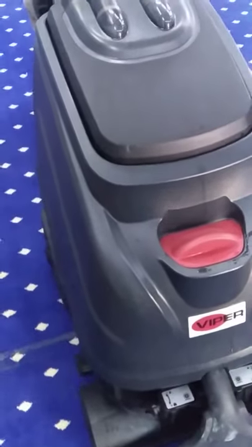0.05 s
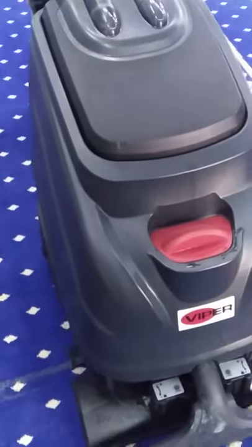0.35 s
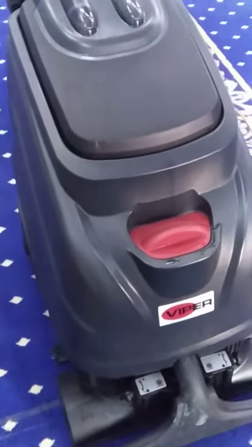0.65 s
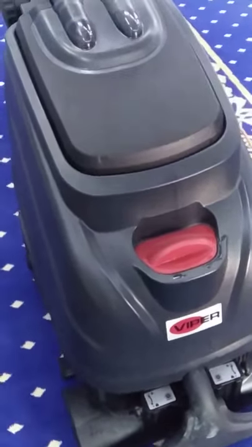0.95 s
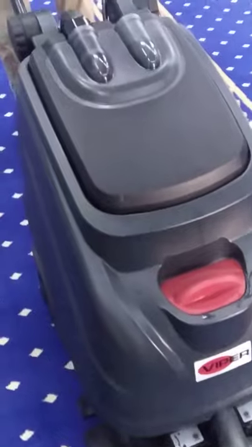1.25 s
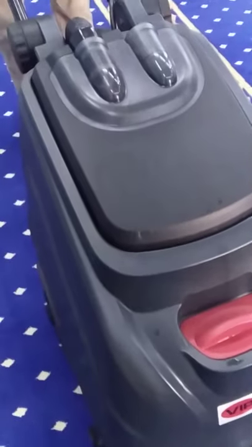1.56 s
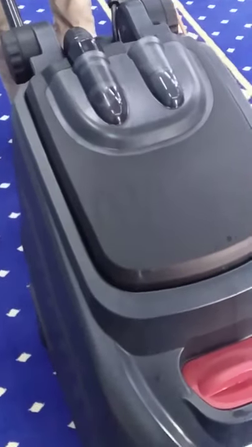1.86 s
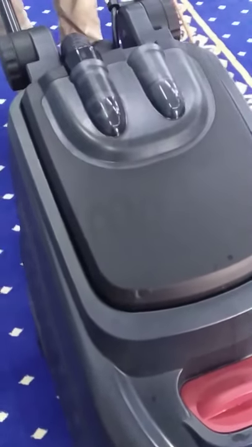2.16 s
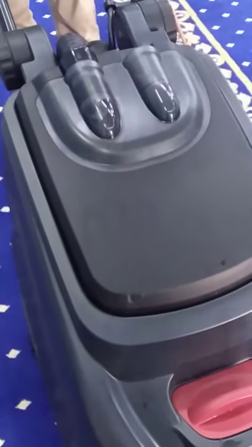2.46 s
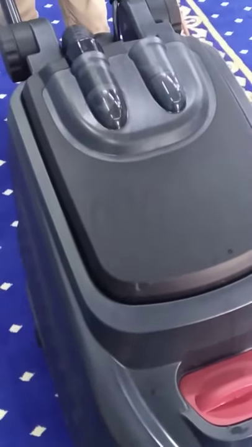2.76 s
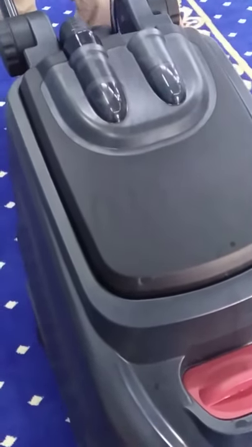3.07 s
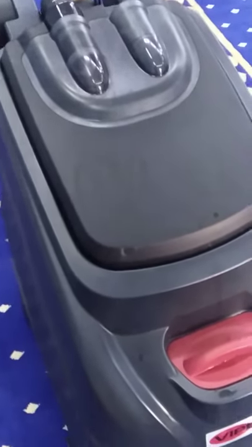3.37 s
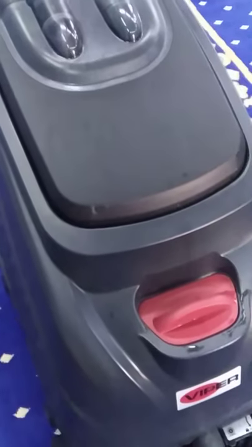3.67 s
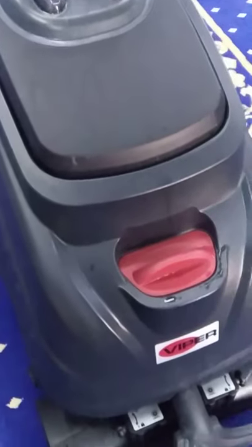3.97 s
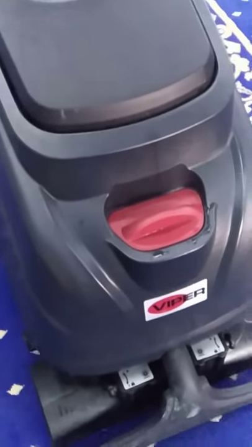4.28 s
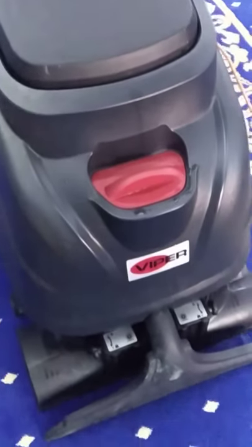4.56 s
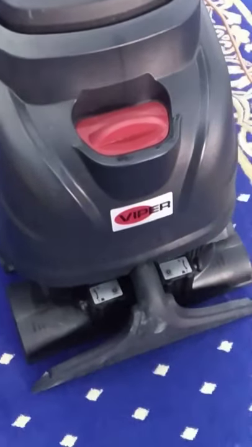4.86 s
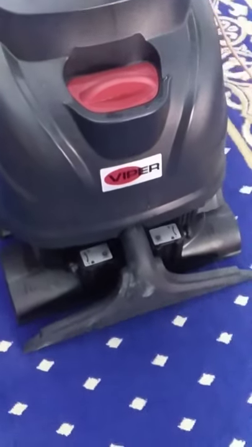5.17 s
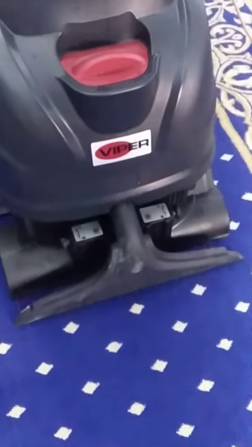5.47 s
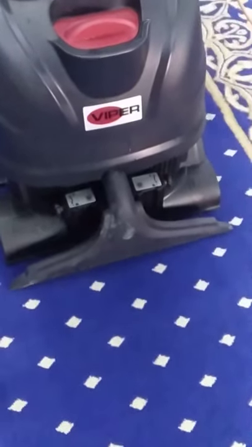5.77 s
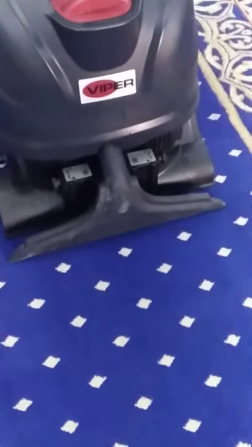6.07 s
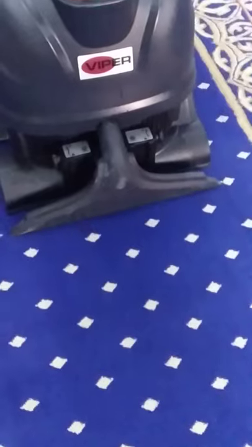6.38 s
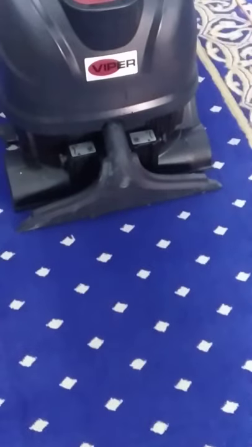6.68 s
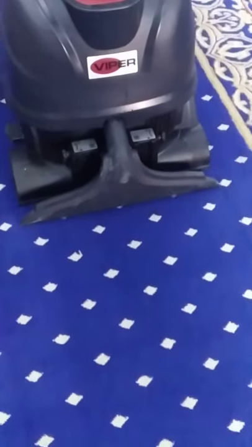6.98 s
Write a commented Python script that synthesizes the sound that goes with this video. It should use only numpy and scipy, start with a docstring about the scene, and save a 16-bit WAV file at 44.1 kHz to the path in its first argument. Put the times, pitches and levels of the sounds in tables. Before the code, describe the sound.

A carpet cleaning machine runs for the whole seven seconds, close to a moving stereo microphone in a carpeted room with little echo. Its vacuum motor gives a strong hum at a steady pitch, with thinner, higher whines fading in and out above it. Underneath, the brush rumbles in the pile while air roars and rushes through the tank. The hum is strongest from about 0.3 to 1.4 seconds, then wavers and shifts between the sides. The suction nozzle adds a fluttering, wet hiss that swells around 0.6 to 1, 3, 4 and 6 seconds and gradually brightens a little. Tiny spits of water come right at the start and near 0.6, 1.8 and 2.1 seconds. Hollow drones from the housing swell gently in turn, near 0.7, 3, 5 and 6 seconds. The machine is still running at the end.

```python
"""A carpet cleaner is drawn slowly over carpet, indoors, close to a moving microphone pair.
From the start the vacuum motor hums at its shaft rate and whines on higher orders, the brush rumbles
in the pile, air roars through the tank, and the suction shoe hisses with fine spray.
Until about 2 s the shoe also spits water. Hollows of the housing drone, swelling one after another
up to 6 s. The top of the hiss opens gradually; the machine is still running at the end, at 7 s."""
import sys
import numpy as np
from scipy import signal
from scipy.fft import rfft, irfft
from scipy.io import wavfile

SR = 44100
rng = np.random.default_rng(int(sys.argv[2]) if len(sys.argv) > 2 else 0)


def persist_wave(psi):
    """Save psi, clipped to +-1, as 16-bit WAV."""
    counts = np.round(np.clip(psi, -1, 1) * 32767).astype(np.int16)
    wavfile.write(sys.argv[1], SR, np.atleast_2d(counts).T)


N = 314433
TIME = np.arange(N) / SR
HZ = np.fft.rfftfreq(N, 1 / SR)

# phase between the microphones: (frequency [Hz], left lead [rad])
MIC_LEAD = [(100, 0), (800, -0.2), (1400, -0.03), (2000, -1.87), (2700, -2.4), (3200, -2.75), (3450, -3.1),
            (3680, -3.17), (3900, -4.1), (4100, -4.4), (4600, -6.5), (5400, -6.5), (6400, -4.5)]
# suction as the shoe's seal tightens and loosens: (time [s], level [dB])
SUCTION_LEVEL = [(0.0, -45), (0.09, -42.5), (0.15, -42.5), (0.45, -39.5), (0.56, -39.5), (0.64, -34.5),
                 (0.8, -37), (1.0, -37.5), (1.07, -37), (1.28, -42), (1.68, -46.5), (1.82, -43.5),
                 (1.9, -44), (2.04, -41), (2.12, -40.5), (2.2, -41), (2.3, -40), (2.4, -41), (2.5, -39.5),
                 (2.68, -42.5), (2.74, -37.5), (2.98, -37.5), (3.07, -38), (3.17, -39), (3.25, -39.5),
                 (3.42, -41.3), (3.77, -40), (3.87, -37.5), (3.99, -36.5), (4.65, -38), (5.16, -41.5),
                 (5.72, -40.5), (5.8, -36.5), (5.97, -35), (6.2, -38), (6.38, -38.5), (6.55, -41),
                 (6.75, -42), (7.11, -40.5)]
# shoe hiss: (frequency [Hz], level [dB])
HISS_SPECTRUM = [(2000,-7.5), (3600,-34), (3950,-2.5), (4300,-0.5), (5200,1.5), (7000,2), (7850,1),
                 (8200,-11), (9000,-11), (10200,-16), (11200,-22), (13300,-25), (14500,-34)]
# shoe hiss: (frequency [Hz], left-right [dB])
HISS_BALANCE = [(3300, 18), (3750, -10), (4000, 5.5), (4600, 4), (6000, 8.5), (7600, 8)]


def gain_of(db):
    """Decibels to amplitude."""
    return 10 ** (np.asarray(db) / 20)


def unit_rms(x):
    """Scale to rms 1."""
    return x / np.sqrt(np.mean(x ** 2) + 1e-20)


def curves(rows):
    """Each column of a time table, per sample."""
    times_s, *columns = np.transpose(rows)
    return [np.interp(TIME, times_s, c) for c in columns]


def per_bin(points):
    """A frequency table, per FFT bin."""
    hz, value = np.transpose(points)
    return np.interp(np.log(HZ + 1), np.log(hz + 1), value)


def colour(points):
    """Spectrum [dB], falling 20 dB/octave beyond the table's ends."""
    hz = np.transpose(points)[0]
    octaves_out = abs(np.log2((HZ + 1) / np.clip(HZ + 1, hz[0], hz[-1])))
    return per_bin(points) - 20 * octaves_out


def peak_db(centre_hz, half_width_hz):
    """Resonance curve, 6 dB down at the half-width."""
    return -20 * np.log10(1 + ((HZ - centre_hz) / half_width_hz) ** 2)


def wander(rate_hz):
    """Random drift of rms 1, up to about rate_hz."""
    return unit_rms(irfft(rfft(rng.standard_normal(N)) / (1 + (HZ / rate_hz) ** 4), N))


def pan(side_db):
    """Constant-power left and right gains."""
    gains = gain_of(np.array([side_db, -side_db]) / 2).reshape(2, -1)
    return gains / np.sqrt(np.mean(gains ** 2, 0))


def turbulence():
    """Two independent white noises."""
    return rng.standard_normal((2, N))


def at_mics(drive, colour_db, side_db):
    """Colour two independent noises and blend them into a partly coherent pair of rms 1."""
    # likeness of the two channels: (frequency [Hz], coherence [0-1])
    mic_coherence = [(30, 0.6), (70, .98), (160, .98), (300, .88), (550, 0.86), (750, 0.74), (1100, .62),
                     (1500, 0.15), (2000, 0.35), (2700, 0.55), (3200, 0.8), (3400, 1), (3850, 1),
                     (4100, 0.15), (7500, 0.5), (8300, 0.05)]
    coherence = np.clip(per_bin(mic_coherence), 0, 1)
    left, other = rfft(drive)
    right = (coherence * left + np.sqrt(1 - coherence ** 2) * other) * np.exp(-1j * per_bin(MIC_LEAD))
    return unit_rms(irfft(np.array([left, right]) * gain_of(colour_db) * pan(side_db), N))


def room(x, wet_db=-15, t60_s=0.3):
    """Add the faint scattered reflections of a carpeted room."""
    t = TIME[:round(t60_s * SR)]
    tail = rng.standard_normal(len(t)) * np.exp(-np.log(1000) * t / t60_s)
    return x + gain_of(wet_db) * signal.oaconvolve(x, tail[None] / np.linalg.norm(tail))[:, :N]


def motor(whine_db=-3.5, jitter_hz=0.14, shake_db=1.2, fade_db=2.8, ripple_rad=0.56, ripple_hz=100):
    """Shaft unbalance hums; bearings, fan blades and commutator whine at multiples of the shaft rate."""
    # vacuum motor: (time [s], shaft rate [Hz])
    shaft_rate = [(0.0, 299.4), (0.72, 298.5), (1.05, 299.3), (1.4, 301.3), (1.74, 302.1), (1.85, 299.7),
                  (2.1, 299.6), (2.45, 300.3), (4.02, 300.7), (4.41, 302.4), (5.85, 301.3), (6.48, 302.5),
                  (7.11, 301.2)]
    # hum as the microphones cross the room's standing waves: (time [s], left [dB], right [dB])
    hum_levels = [(0.0, -46, -37), (0.1, -44, -48), (0.24, -26, -27.5), (0.63, -23, -23), (0.9, -27.5, -26),
                  (1.15, -37, -32), (1.38, -28.5, -29.5), (1.58, -48, -33.5), (1.74, -40.5, -54),
                  (1.85, -52, -37), (1.98, -31, -36.5), (2.1, -28, -35), (2.27, -32.5, -50),
                  (2.55, -27.5, -38), (2.75, -31.5, -48), (3.02, -33, -40), (3.15, -28.5, -39),
                  (3.45, -41, -50), (3.6, -35.5, -43), (3.75, -56, -58), (3.88, -36.5, -48),
                  (3.98, -42, -56), (4.1, -40, -52), (4.27, -31, -38), (4.62, -31.5, -40.5),
                  (5.1, -34.5, -49), (5.52, -35.5, -50), (5.65, -44.5, -40.5), (6.06, -36.5, -42),
                  (6.5, -45.5, -50), (6.72, -58, -52), (6.93, -49, -45), (7.11, -40, -36.5)]
    # hum phase in the same waves: (time [s], left lead [rad])
    hum_lead = [(0, 0.4), (.75, 0.27), (1.25, 0.5), (1.53, 0.5), (1.65, 3.5), (1.87, 1), (1.94, 0.3),
                (2.2, -2), (2.3, 1), (2.68, 0.7), (2.78, -1), (3.05, -1.5), (3.3, -2), (3.58, -1.0),
                (3.7, 2), (4.05, 2.6), (4.2, -0.9), (4.75, 0.1), (5.6, -1.7), (6.1, -1.0), (6.5, -1.8),
                (7.13, -0.3)]
    # whine at the moving microphones, by shaft order: (time [s], left [dB], right [dB])
    whine_orders = { 3: [(0, -58, -59), (.35, -58, -55), (.7, -47, -66), (1.1, -55, -62), (1.35, -48, -68),
                    (1.6, -43, -49.5), (1.87, -51, -63), (2.25, -47, -44), (2.65, -41, -45),
                    (2.85, -56, -56), (3.08, -45.5, -52), (3.4, -49, -60), (4.0, -55, -54),
                    (4.35, -61, -64), (4.6, -48, -49), (5.35, -65, -66), (5.6, -51, -48), (6.0, -47, -47),
                    (6.25, -57, -50), (6.75, -47, -45), (7.13, -49, -52)], 6: [(0, -64, -64),
                    (.3, -54, -51), (.5, -55, -51), (.7, -56, -45), (.95, -59, -64), (1.2, -56, -53),
                    (1.35, -50, -52), (1.7, -49, -45), (1.95, -58, -57), (2.35, -45, -57), (2.65, -55, -64),
                    (3.15, -63, -62), (3.55, -49, -52), (4.1, -75, -58), (4.4, -53, -46), (4.7, -58, -51),
                    (5.0, -63, -66), (5.7, -62, -64), (6.1, -48, -47), (6.45, -46, -51), (6.7, -51, -67),
                    (7.13, -62, -55)], 12: [(0.05, -54, -56), (.3, -53, -51), (.7, -49, -46),
                    (1.25, -47, -59), (1.52, -56, -62), (1.78, -47, -50.5), (2.0, -47, -62),
                    (2.38, -61, -62), (2.6, -48.5, -48.5), (2.85, -47, -49), (3.12, -43, -54),
                    (3.42, -64, -58), (3.65, -48.5, -49), (4.15, -47, -52), (4.5, -44, -48),
                    (4.8, -49, -57), (5.17, -66, -63), (5.47, -50, -50), (5.8, -63, -63), (6.25, -62, -60),
                    (6.5, -53, -49.5), (6.72, -63, -60)], 22: [(0, -59, -47), (.5, -41, -41),
                    (.78, -52, -44), (1.08, -45, -42), (1.3, -50, -50), (1.48, -44, -51), (1.8, -54, -56),
                    (2.13, -46, -51), (2.3, -52, -52), (2.52, -39.5, -63), (2.8, -50, -56),
                    (2.95, -43, -48), (3.12, -53, -58), (3.45, -48, -54), (3.95, -44, -54),
                    (4.45, -50, -54), (4.75, -49, -46), (5.3, -45, -56), (5.8, -46, -64), (6.15, -50, -63),
                    (6.4, -50, -58), (7.13, -46, -50)]}
    shaft_hz, = curves(shaft_rate)
    angle = 2 * np.pi * np.cumsum(shaft_hz + jitter_hz * wander(18.4)) / SR
    lead_rad, = curves(hum_lead)
    hum_db = np.array(curves(hum_levels)) + shake_db * wander(17.0)
    hum = gain_of(hum_db) * np.cos([angle, angle - lead_rad])
    # mains torque ripple: sidebands on the high orders
    ripple = ripple_rad * np.sin(2 * np.pi * ripple_hz * TIME)
    whine = np.zeros((2, N))
    for order, levels in whine_orders.items():
        phase = order * angle + ripple * (order / max(whine_orders)) ** 2
        lag_rad = np.interp(order * shaft_hz.mean(), HZ, per_bin(MIC_LEAD))
        # shifting reflections fade each line in and out
        line_db = np.array(curves(levels)) + whine_db + fade_db * wander(8.4)
        whine += gain_of(line_db) * np.cos([phase, phase - lag_rad])
    return np.sqrt(2) * (hum + whine)


def brush(level_db=2.5, lumpy_db=0.5, lumpy_hz=5.1):
    """Bristles beat the pile and shake the housing under a lumpy load; the brush motor hums."""
    # resonances shaken by the brush: (centre [Hz], width [Hz], lift [dB])
    resonances = [(135, 4.2, 4.5), (170.3, 11, 6.5), (209.6, 7.8, 5), (239.4, 7.1, 5), (252, 8.7, -0.5),
                  (266, 4.2, 4), (350.3, 10, 6.5)]
    # rumble: (frequency [Hz], level [dB])
    rumble_spectrum = [(20.0, -32), (55.0, -30), (72.0, -25.5), (95.0, -8.5), (135.0, 0.5), (160.0, -7.5),
                       (250.0, -6), (370.0, -10.5), (460.0, -9.5), (700.0, -31)]
    # rumble: (frequency [Hz], left-right [dB])
    rumble_balance = [(60, 1.1), (350, 1.3)]
    # rumble as the brush bears on the pile: (time [s], level [dB])
    rumble_level = [(0.0, -41), (0.3, -37), (0.7, -38), (1.2, -39), (1.55, -43), (1.75, -39), (2.25, -40.5),
                    (2.5, -37.5), (3.3, -40.5), (3.65, -38), (4.2, -40), (5.0, -39.5), (5.6, -41.5),
                    (6.05, -40), (6.4, -39.5), (6.75, -45), (7.13, -42.5)]
    # mains hum: (frequency [Hz], level [dB])
    mains_lines = [(100, -57.5), (200, -57)]
    lift_db = sum(db / (1 + (2 * (HZ - hz) / width_hz) ** 2) for hz, width_hz, db in resonances)
    rumble = at_mics(turbulence(), colour(rumble_spectrum) + lift_db, per_bin(rumble_balance))
    press_db, = curves(rumble_level)
    mains = sum(gain_of(db) * unit_rms(np.sin(2 * np.pi * (hz * TIME + rng.random())))
                for hz, db in mains_lines)
    return rumble * gain_of(press_db + level_db + lumpy_db * wander(lumpy_hz)) + mains


def airflow(duct_db=-40.5, usual_suction_db=-40.5, rush_db_per_db=0.57, buffet_db=1.28):
    """Air roars in the tank with the load, howls at the outlet and rushes in the ducts with suction."""
    # effect of microphone position: (time [s], howl [dB], roar and howl left-right [dB],
    # rush left-right [dB])
    position = [(0.0, -44, -8, -4), (0.51, -38.5, -7.5, -5), (1.71, -47, -9, -3), (2.1, -47, -3, 2),
                (2.25, -48.5, -2.5, -0.5), (3.18, -50, -2.5, 2), (3.42, -49, -4, 1),
                (5.31, -41, -0.5, -4.5), (6.51, -41.5, -1.5, -3), (7.11, -42, -0.5, -3.5)]
    # tank roar under load: (time [s], level [dB])
    roar_level = [(0.0, -40.5), (0.35, -37.5), (0.65, -37), (1.2, -39.5), (1.6, -38.5), (1.9, -40.5),
                  (2.14, -36), (2.3, -42), (2.58, -36.5), (3.1, -38), (3.4, -38.5), (4.0, -37.5),
                  (4.43, -41), (4.6, -37.5), (5.3, -39.5), (5.95, -37.5), (6.4, -36.5), (6.7, -42.5),
                  (7.0, -37), (7.13, -38)]
    # air noise: (frequency [Hz], left-right [dB])
    air_balance = [(400, -3), (520, 2.5), (620, -2.5), (760, -1.5), (900, 1.5), (1050, -4.5), (1300, -0.5),
                   (1600, -3), (2200, 1.5), (3500, 1)]
    # tank, outlet and ducts: (frequency [Hz], level [dB])
    roar_spectrum = [(250,-12.5), (380,-8), (460,-4.5), (550,-1), (590,0.5), (625,-2.5), (680,-5),
                     (800,-23.5), (950,-10), (1200,-21), (2000,-68)]
    howl_spectrum = [(560, -46), (690, -1.5), (770, 3.5), (860, 0.5), (980, -15), (1120, -8.5),
                     (1290, -4.5), (1550, -15.5)]
    rush_spectrum = [(600,-17), (850,-1), (1050,0), (1300,-1), (1650,-0.5), (1950,-0.5), (2200,0),
                     (2800,-1), (3400,0), (4000,-6), (6000,-14)]
    howl_db, tank_side_db, duct_side_db = curves(position)
    roar_db, = curves(roar_level)
    suction_db, = curves(SUCTION_LEVEL)
    rush_db = duct_db + rush_db_per_db * (suction_db - usual_suction_db)
    side_db = per_bin(air_balance)
    roar = at_mics(turbulence(), colour(roar_spectrum), side_db) * gain_of(roar_db)
    howl = at_mics(turbulence(), colour(howl_spectrum), side_db) * gain_of(howl_db)
    rush = at_mics(turbulence(), colour(rush_spectrum), side_db) * gain_of(rush_db)
    tank = (roar + howl) * pan(tank_side_db + 0.4) * gain_of(buffet_db * wander(22))
    ducts = rush * pan(duct_side_db + 2.0) * gain_of(buffet_db * wander(22))
    return room(tank + ducts)


def cavities():
    """Air drones in the hollows of the housing; each swells as the microphones pass it."""
    # (nearest at [s], half-span [s], level [dB], centre [Hz], half-width [Hz], left-right [dB])
    hollows = [(0.7, 1, -42, 606, 24, -6), (2.7, 0.37, -50, 922, 37, -4), (3.2, 2.2, -51.5, 589, 23, -10),
               (5.2, 0.55, -46.5, 1220, 140, -4), (5.95, 0.73, -45, 783, 38, -3)]
    out = np.zeros((2, N))
    for nearest_s, half_span_s, db, hz, half_width_hz, side_db in hollows:
        drone = at_mics(turbulence(), peak_db(hz, half_width_hz), side_db)
        out += drone * gain_of(db) / (1 + ((TIME - nearest_s) / half_span_s) ** 2)
    return out


def suction(level_db=3.0, flutter_db=0.68, drops_per_s=1800, drop_spread_db=4.5, spray_db=-8,
            fizz_hz=8300, fizz_start_db=-0.45, fizz_db_per_s=0.59):
    """Air tears through wet pile under the shoe: a fluttering hiss with bursting droplets."""
    # shoe hiss at the moving microphones: (time [s], left-right [dB])
    shoe_balance = [(0, 2), (1.1, 0), (1.6, -3.5), (2.15, 1), (2.75, 2.5), (3.3, -0.5), (4.1, 0),
                    (5.5, -0.5), (6.3, -0.5), (6.8, -4)]
    drop_sizes = gain_of(drop_spread_db * np.minimum(rng.exponential(1, (2, N)), 4))
    signs = rng.choice([-1, 1], (2, N))
    bursts = rng.random((2, N)) < drops_per_s / SR
    spray = gain_of(spray_db) * unit_rms(drop_sizes * signs * bursts)
    hiss = at_mics(turbulence() + spray, colour(HISS_SPECTRUM), per_bin(HISS_BALANCE))
    fizz = irfft(rfft(hiss) * (HZ > fizz_hz), N)
    hiss += fizz * (gain_of(fizz_start_db + fizz_db_per_s * TIME) - 1)
    seal_db, = curves(SUCTION_LEVEL)
    side_db, = curves(shoe_balance)
    return hiss * pan(side_db) * gain_of(seal_db + level_db + flutter_db * wander(23))


def spits(rise_s=0.002):
    """Each slug of water pulled into the shoe spurts, or chirps where the gap is narrow."""
    # (time [s], level [dB], centre [Hz], half-width [Hz], decay [s])
    slugs = [(0.065, -28, 7000, 1700, 0.009), (0.112, -46, 5800, 2500, .014),
             (0.610, -30, 5160, 2500, 0.04), (1.737, -34, 7450, 400, .003), (1.761, -36, 8000, 4000, .011),
             (1.798, -30, 7900, 300, 0.0032), (2.112, -35, 6500, 3500, 0.025)]
    out = np.zeros((2, N))
    for start_s, db, hz, half_width_hz, decay_s in slugs:
        age_s = np.maximum(TIME - start_s, 0)
        spectrum_db = colour(HISS_SPECTRUM) / 2 + peak_db(hz, half_width_hz)
        spurt = at_mics(turbulence(), spectrum_db, per_bin(HISS_BALANCE))
        out += spurt * gain_of(db) * (1 - np.exp(-age_s / rise_s)) * np.exp(-age_s / decay_s)
    return out


def scene():
    """The whole machine, in stereo."""
    return motor() + brush() + airflow() + cavities() + suction() + spits()


def record(dry, band_top_hz=3830, skirt_hz=40, cutoff_hz=14300):
    """Duller right microphone, a treble band where the channels' shared part fades, then a low-pass."""
    # right microphone: (frequency [Hz], gain [dB])
    right_response = [(7700, -0.5), (8000, -17), (8300, -20), (9200, -10.5), (13000, -7.5)]
    # treble band: (time [s], lower edge [Hz], gain of shared part [dB])
    fading_band = [(0, 3280, -23), (1.7, 3430, -16), (2.0, 3400, -1), (4.6, 3340, 2), (5.1, 3300, -29),
                   (6.1, 3260, -15), (6.5, 2800, -17)]
    right = irfft(rfft(dry[1]) * gain_of(per_bin(right_response)), N)
    mics = np.array([dry[0], right])
    hz, frames_s, shared = signal.stft(mics.mean(0), SR, nperseg=1024)
    hz = hz[:, None]
    low_hz, shared_db = (np.interp(frames_s, TIME, c) for c in curves(fading_band))
    in_band = (np.tanh((hz - low_hz) / skirt_hz) - np.tanh((hz - band_top_hz) / skirt_hz)) / 2
    mics += signal.istft(shared * (gain_of(in_band * shared_db) - 1), SR)[1][:N]
    lowpass = signal.firwin(511, cutoff_hz, window=("kaiser", 9), fs=SR)
    return signal.oaconvolve(mics, lowpass[None], "same")


dry = scene()
out = record(dry)
persist_wave(out)
```